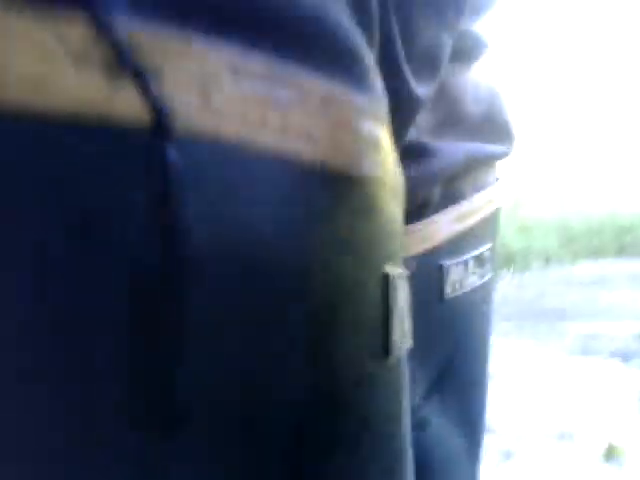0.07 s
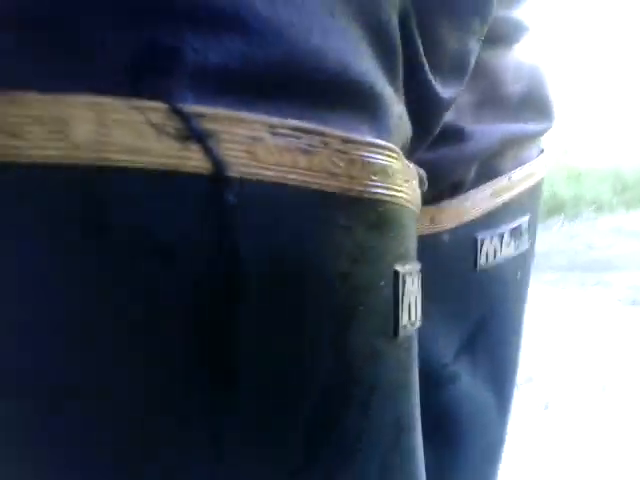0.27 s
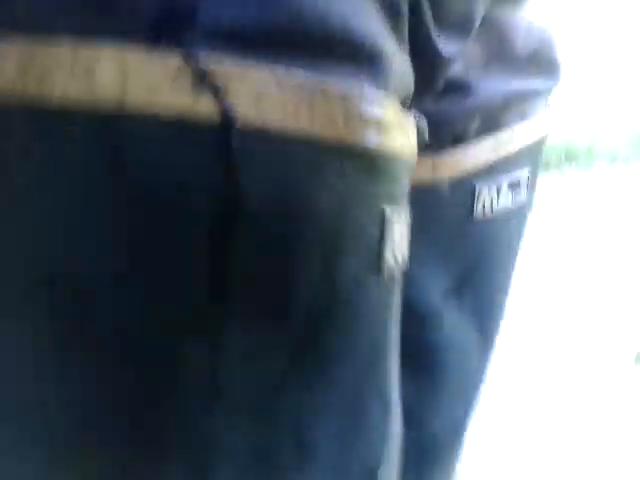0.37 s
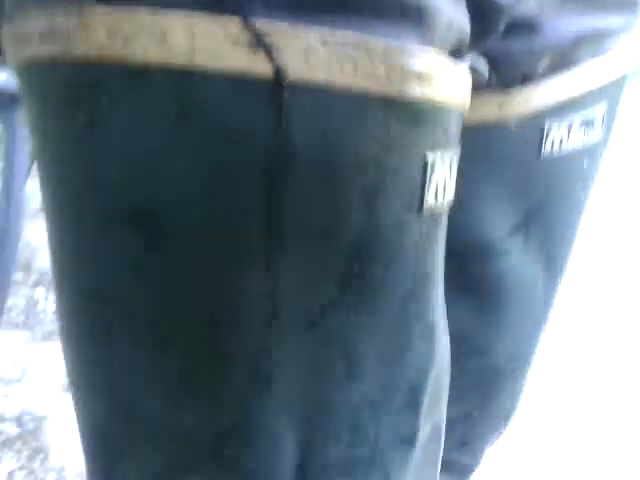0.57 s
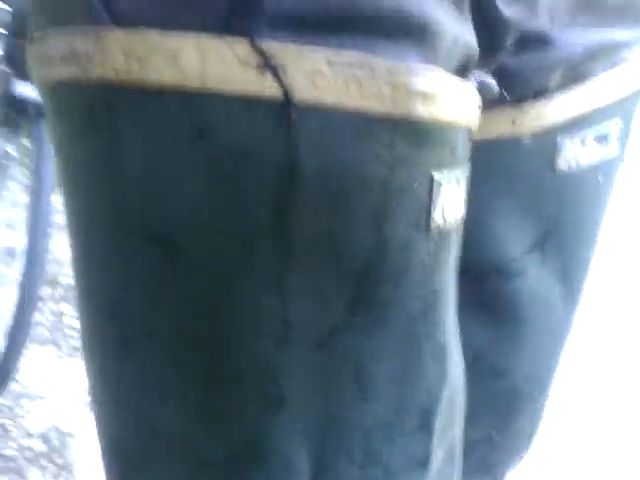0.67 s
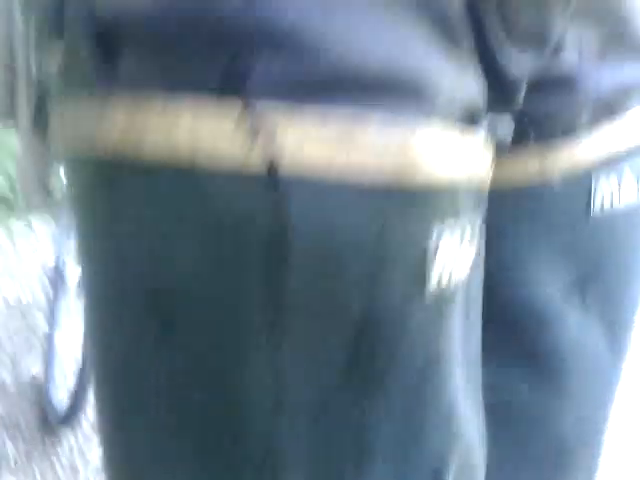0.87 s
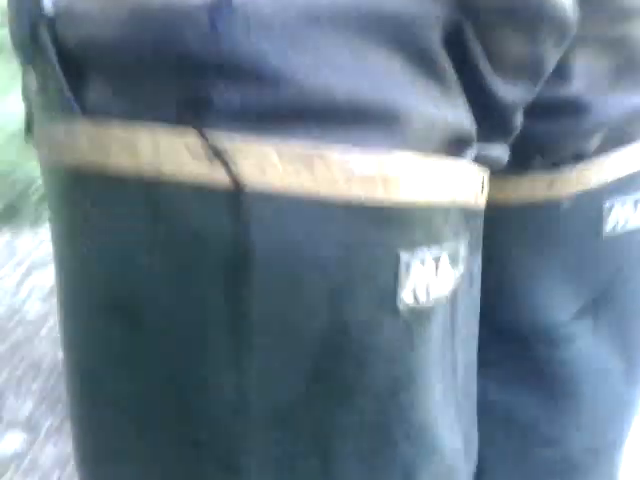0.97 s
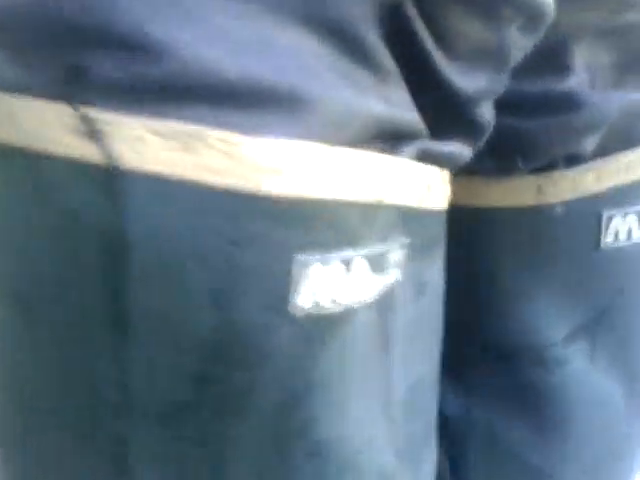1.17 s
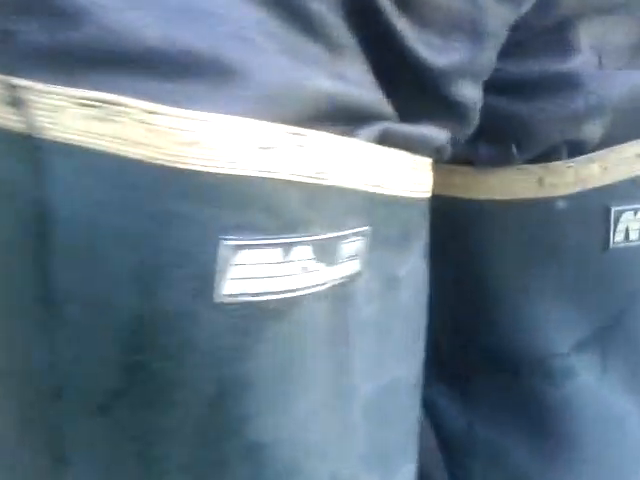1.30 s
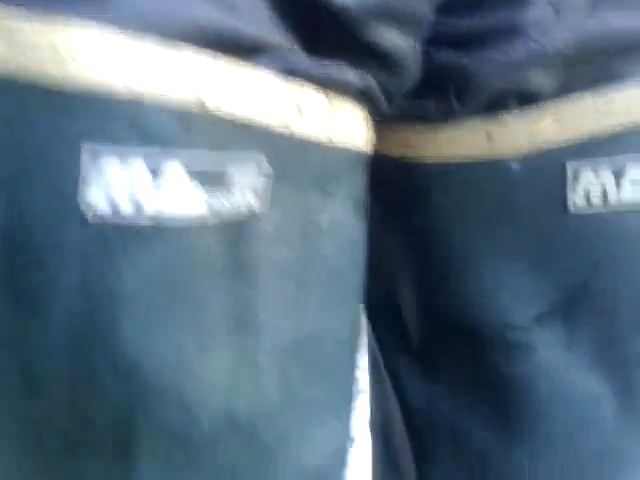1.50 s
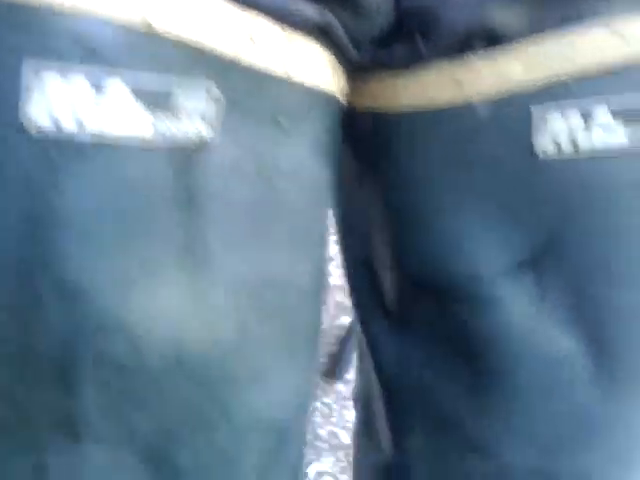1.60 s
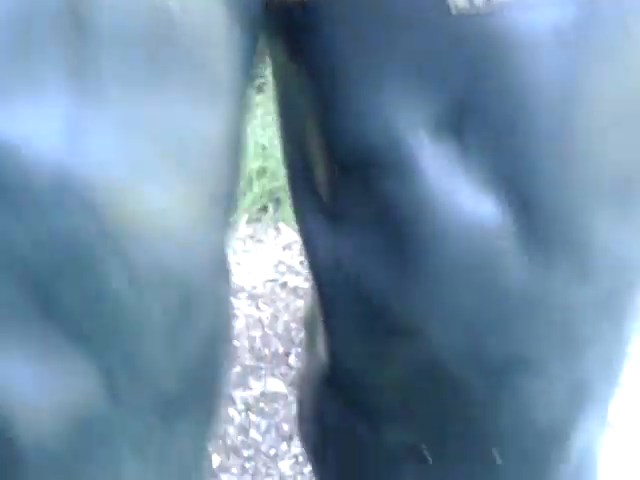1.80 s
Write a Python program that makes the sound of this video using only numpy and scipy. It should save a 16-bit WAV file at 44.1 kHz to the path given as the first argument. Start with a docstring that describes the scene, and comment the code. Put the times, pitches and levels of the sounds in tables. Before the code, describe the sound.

Tall rubber boots give a hollow tap, then a loud snapping knock, followed by soft rubbing and small crease ticks. Steady outdoor wind and light grip bumps run underneath on a close, dull-sounding hand-held microphone.

```python
"""Rubber waders move close to a hand-held microphone outdoors, over a continuous airy rush.
A boot lands with a hollow tap at 0.2 s. Near 0.37 s a sharp snap leads into a heavy knock
that overloads the microphone. Then rubber and cloth scuff and creases tick until about 1.2 s.
The grip bumps softly throughout. The microphone passes little above 4 kHz."""
import sys
import numpy as np
from scipy import signal
from scipy.fft import rfft, irfft, next_fast_len
from scipy.io import wavfile
from scipy.ndimage import uniform_filter1d

SR = 44100
rng = np.random.default_rng(int(sys.argv[2]) if len(sys.argv) > 2 else 0)


def int16_out(signal):
    """Quantize to a 16-bit WAV file."""
    q = np.round(np.clip(np.atleast_2d(signal).T, -1, 1) * 32767)
    wavfile.write(sys.argv[1], SR, q.astype(np.int16))


N = 81585


def knock():
    """Bright snap, then a heavy blow over a brief low thump; low modes lag, so the pitch falls."""
    # resonances of snap and blow: (frequency [Hz], level [dB], t60 [s])
    snap_modes = [(259.6, -13.5, .06), (496, -11.5, 0.028), (1101, -13, 0.032), (1538, -17, 0.02),
                  (2080, -17, 0.012), (3210, 0.5, 0.0041), (3560, -7.5, 0.0054)]
    blow_modes = [(241.3, -12, 0.044), (369, -3, 0.038), (431.3, -14, 0.095), (650.7, -1.5, .022),
                  (1000.6, 2.5, 0.0131), (1333, -8, 0.02), (1595, 1, 0.0122), (2187, -8, 0.0098),
                  (2590, -4.5, 0.0065), (3740, -6, 0.018)]
    snap_s, blow_s = .3672, .3786
    thump_db, thump_sigma_s = -20, .002
    snap = ring(snap_s, snap_modes, lag_cycles=.26, rise_cycles=.9)
    blow = ring(blow_s, blow_modes, lag_cycles=1.6, rise_cycles=1.16)
    low_thump = swells([(blow_s + thump_sigma_s, thump_db, thump_sigma_s)])
    return snap + blow - low_thump


def taps():
    """A boot touches lightly twice, then lands with a hollow tap."""
    # contacts: (time [s], level [dB])
    contacts = [(.1848, -22), (.1942, -12.5), (.198, -1)]
    # tap resonances: (frequency [Hz], level [dB], t60 [s])
    modes = [(250, -39.5, 0.087), (380, -19, .062), (519, -10, 0.03), (761, -18.5, 0.053),
             (1138, -13.5, 0.01), (1526, -15.5, 0.011), (2075, -26, 0.0072)]
    return sum(undb(db) * ring(s, modes, lag_cycles=.76, rise_cycles=.85) for s, db in contacts)


def ticks():
    """Rubber creases flip with short dead ticks; small creases are brighter."""
    # crease flips: (time [s], level [dB], tilt [dB/octave])
    flips = [(.186, -17, 7), (.8266, 3.5, -.5), (0.838, -5, -1), (1.022, -18, 8), (1.059, -21, 6),
             (1.14, -18, 6), (1.155, -15, 7), (1.178, -19, 7)]
    # crease resonances: (frequency [Hz], level [dB], t60 [s])
    modes = [(477, -28, 0.02), (1030, -19.5, 0.0059), (2250, -20.5, 0.0069), (3250, -29, 0.0043)]
    pivot_hz = modes[1][0]
    out = np.zeros(N)
    for start_s, flip_db, tilt in flips:
        tilted = [(hz, db + tilt * np.log2(hz / pivot_hz), t60) for hz, db, t60 in modes]
        out += undb(flip_db) * ring(start_s, tilted, lag_cycles=.05, rise_cycles=.4)
    return out


def scuffs():
    """Rubber and cloth rub in dense tiny slips of uneven size."""
    # rubs: (time [s], level [dB], sigma [s])
    rubs = [(.189, -42.5, 0.0054), (.315, -63.5, 0.028), (.448, -47.5, .022), (.553, -51, .015),
            (.722, -43.5, 0.019), (.762, -57, .018), (.813, -45.5, 0.0095), (.839, -39, .008),
            (1.022, -50, .005), (1.063, -45.5, 0.0093), (1.16, -38, 0.018), (1.205, -52, .012)]
    # friction spectrum: (frequency [Hz], relative level [dB])
    spectrum = [(100, -53), (500, -25.5), (1000, -4.5), (1600, -13.5), (2250, 6.5), (2700, -1.5), (3200, 7),
                (4000, -11)]
    slips_per_s, spread_db = 980, 3
    slips = rng.random(N) < slips_per_s / SR
    signs = np.sign(rng.standard_normal(N))
    sizes = undb(spread_db * rng.standard_normal(N))
    return colour(slips * signs * sizes, spectrum) * swells(rubs)


def bumps():
    """Dull rumbles as the grip shifts."""
    # grip shifts: (time [s], level [dB], sigma [s])
    shifts = [(.034, -41, 0.0078), (.281, -43, 0.015), (.345, -47, 0.018), (.44, -41, 0.031),
              (.503, -41.5, 0.012), (.85, -43.5, 0.01), (1.062, -43, .007), (1.678, -46, 0.0096),
              (1.836, -39, .008)]
    # rumble spectrum: (frequency [Hz], relative level [dB])
    spectrum = [(30, -33), (90, -23.5), (170, -9), (340, -1), (470, -3), (700, -16), (1500, -20.5),
                (4000, -40.5)]
    return colour(rng.standard_normal(N), spectrum) * swells(shifts)


def rush():
    """Outdoor air swells, eases and flutters slightly."""
    # rush envelope: (time [s], level [dB])
    envelope = [(0, -49.5), (.17, -47.5), (.3, -41), (.47, -39), (0.619, -42), (0.781, -38.5), (.9, -40.7),
                (1.1, -42), (1.24, -45.5), (1.5, -45), (1.85, -44.5)]
    # air spectrum: (frequency [Hz], relative level [dB])
    spectrum = [(25, -35.5), (50, -33), (85, -27.5), (140, -25), (220, -14), (290, -7), (415, -1),
                (550, -5), (680, -3.5), (950, -3.5), (1310, -9.5), (1550, -14), (2300, -16.5),
                (2600, -19.5), (3370, -13), (3700, -17), (4200, -23)]
    flutter_db = 1.34 * walk(rate_hz=23.3)
    level_db = np.interp(clock(), *np.array(envelope).T) + flutter_db
    return colour(rng.standard_normal(N), spectrum) * undb(level_db)


def ring(start_s, modes, lag_cycles, rise_cycles):
    """Modes after one blow: each waits, swells, then decays."""
    out = np.zeros(N)
    for hz, db, t60_s in modes:
        age_s = np.maximum(clock() - start_s - lag_cycles / hz, 0)
        swell = np.sin(np.pi / 2 * np.minimum(age_s * hz / rise_cycles, 1)) ** 2
        fade = np.exp(-np.log(1000) * np.maximum(age_s - rise_cycles / hz, 0) / t60_s)
        out += undb(db) * swell * fade * np.sin(2 * np.pi * hz * age_s)
    return out


def swells(rows):
    """Sum of Gaussian pulses."""
    return sum(undb(db) * np.exp(-.5 * ((clock() - s) / sigma_s) ** 2) for s, db, sigma_s in rows)


def walk(rate_hz):
    """Smooth random motion, standard deviation 1."""
    window = max(int(SR / rate_hz), 1)
    y = uniform_filter1d(uniform_filter1d(rng.standard_normal(N), window), window)
    return y / np.std(y)


def shape(x, points):
    """Filter x by (frequency [Hz], gain [dB]) points."""
    hz, db = np.array(points, float).T
    size = next_fast_len(2 * N)
    bins_hz = np.maximum(np.fft.rfftfreq(size, 1 / SR), 1)
    gain = undb(np.interp(np.log(bins_hz), np.log(hz), db))
    return irfft(rfft(x, size) * gain, size)[:N]


def colour(x, points):
    """Shape x and scale to rms 1."""
    y = shape(x, points)
    return y / np.std(y)


def undb(db):
    """Decibels to gain."""
    return 10 ** (np.asarray(db) / 20)


def clock():
    """Sample times [s]."""
    return np.arange(N) / SR


def scene():
    """Mono sum; the small contacts lose their deep bass."""
    bass_cut_hz = 193
    highpass = signal.butter(3, bass_cut_hz, "high", fs=SR, output="sos")
    contacts = signal.sosfilt(highpass, taps() + ticks() + 1e-18)
    return (contacts + knock() + scuffs() + bumps() + rush())[None]


def record(dry):
    """Narrow-band microphone, overload on the loudest peaks, low-pass."""
    # microphone response: (frequency [Hz], gain [dB])
    response = [(3550, 0), (3850, -5), (4050, -14), (4400, -22), (4650, -45), (5200, -94)]
    ceiling, knee, top_hz = .82, 5.1, 15900
    narrow = shape(dry[0], response)[None]
    clipped = narrow / (1 + np.abs(narrow / ceiling) ** knee) ** (1 / knee)
    return signal.sosfilt(signal.ellip(8, .2, 70, top_hz, fs=SR, output="sos"), clipped)


dry = scene()
out = record(dry)
int16_out(out)
```